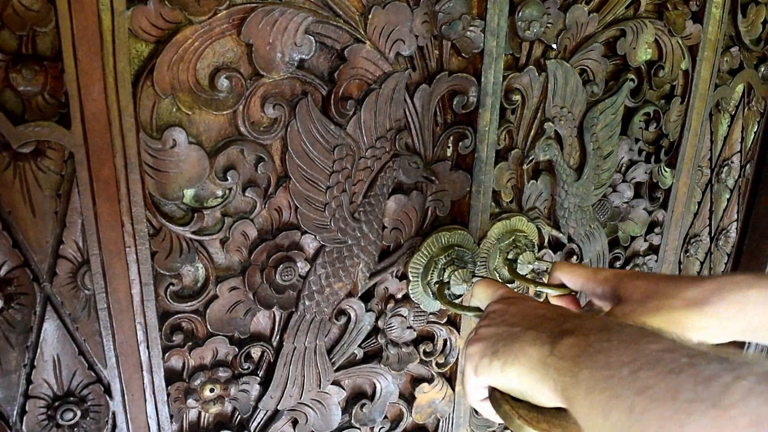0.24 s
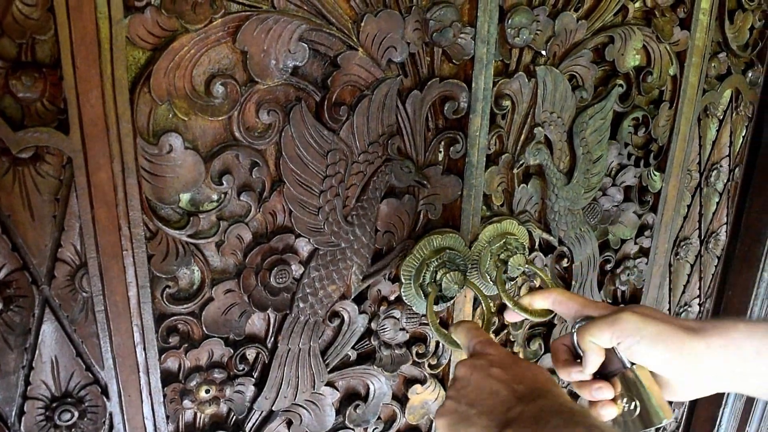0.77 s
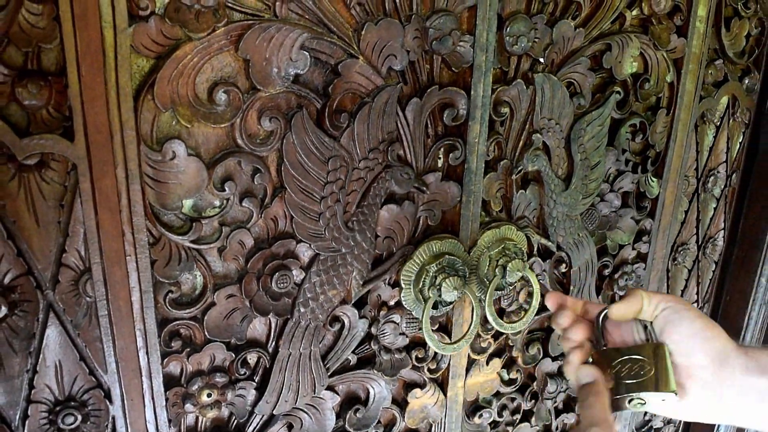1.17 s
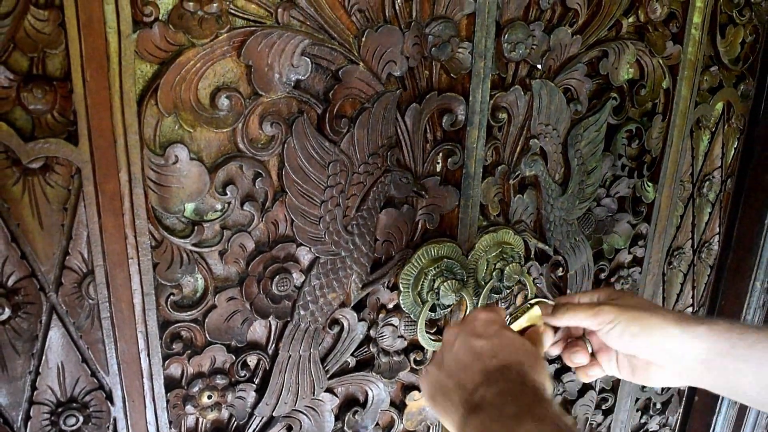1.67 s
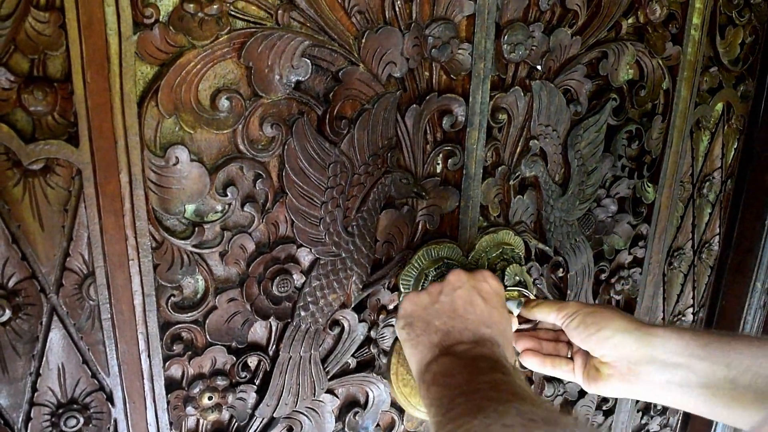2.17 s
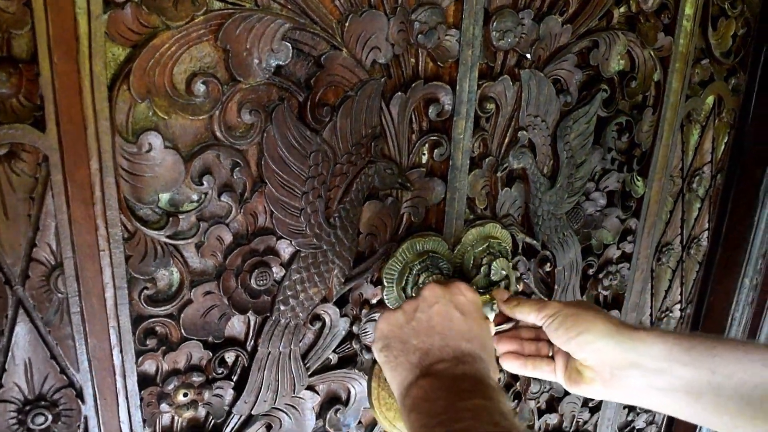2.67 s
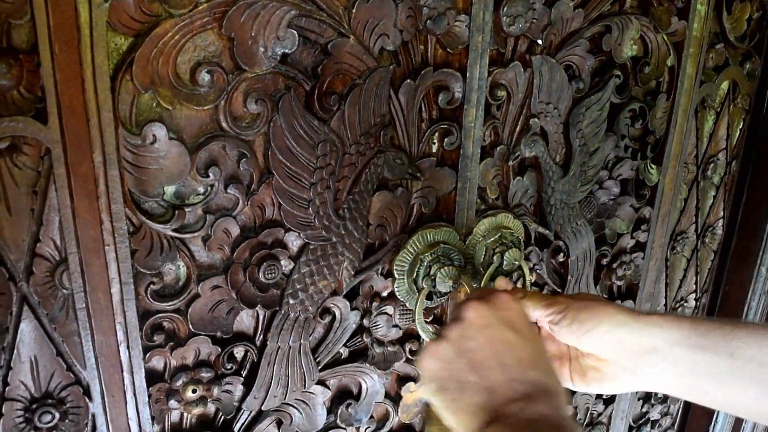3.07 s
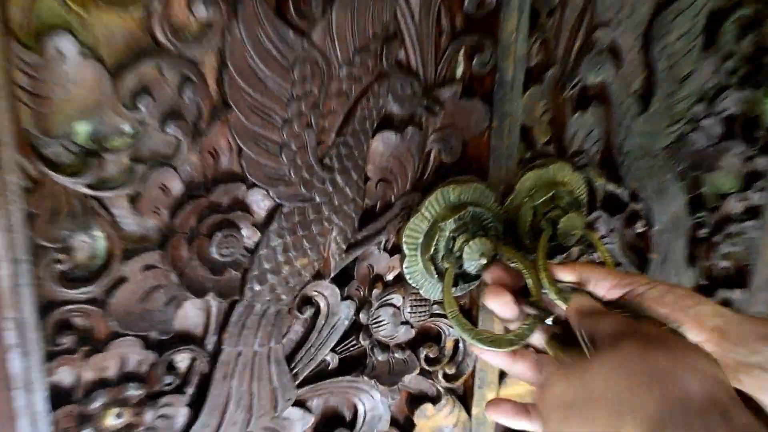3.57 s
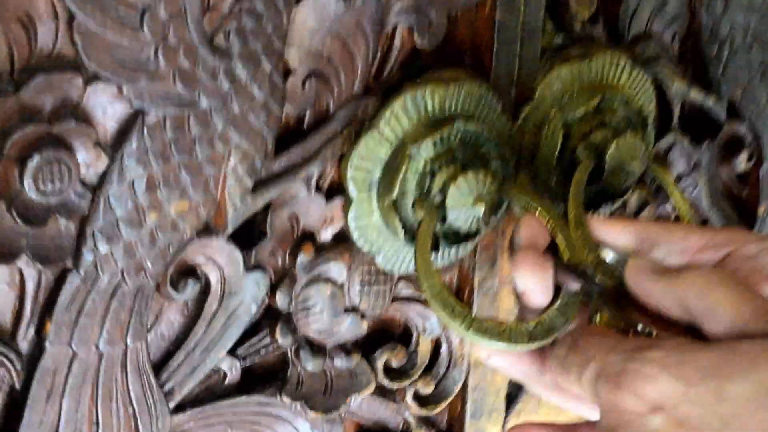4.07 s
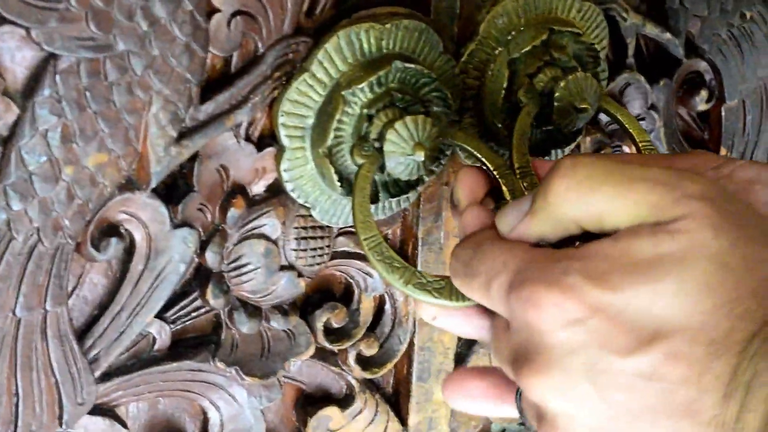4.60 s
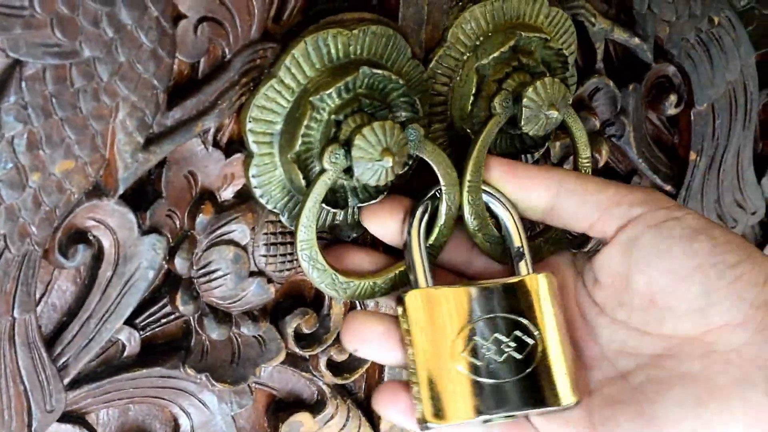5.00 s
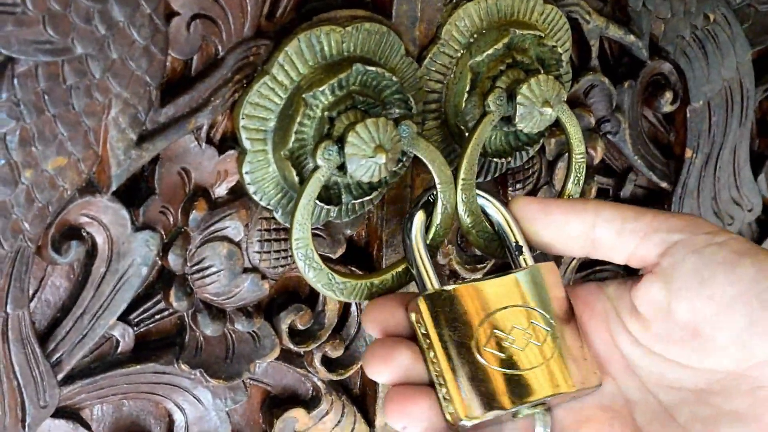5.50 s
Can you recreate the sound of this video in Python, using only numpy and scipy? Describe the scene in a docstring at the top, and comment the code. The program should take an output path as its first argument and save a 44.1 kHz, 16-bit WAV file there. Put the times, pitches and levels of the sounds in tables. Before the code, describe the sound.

In a small porch, heavy door leaves bump shut with a cluster of loud, booming wooden thuds and a faint squeak. Brass rings and a padlock then clink, rattle and scrape irregularly, with a few sharp clanks, until the padlock snaps shut. Fingers bump the hand-held camera's case; a distant bird whistles upward twice over faint air and rumble.

```python
"""In a small porch, close to a heavy carved wooden door, with one microphone in a hand-held camera.
The leaves squeak on a dry hinge and thud shut: noise and panel modes shaped register by register.
Brass ring handles and a padlock clink and scrape: struck modes, and trains of tiny slips.
The padlock snaps shut; fingers bump the camera, whose case ticks, and a bird slurs upward twice.
Behind lie filtered-noise air and rumble, and a faint hum of wavering tones."""
import sys
import numpy as np
from scipy import signal
from scipy.fft import rfft, irfft, next_fast_len
from scipy.io import wavfile
from scipy.ndimage import uniform_filter1d, map_coordinates

SR = 44100
rng = np.random.default_rng(int(sys.argv[2]) if len(sys.argv) > 2 else 0)


def int16_out(signal):
    """Quantize to a 16-bit WAV file."""
    q = np.round(np.clip(np.atleast_2d(signal).T, -1, 1) * 32767)
    wavfile.write(sys.argv[1], SR, q.astype(np.int16))


N = 253442

# Door leaves meet [t/s, clack level/dB before the door trim, wood level/dB before the door trim,
# treble slope/dB per octave, chatter/s]
THUDS = [(0.079, -4.5, -8.5, -8, 0.00071), (.104, -2.5, -1, -7.5, 0.013), (.126, -15.5, -2, -5, .024),
         (.159, -21.5, -2.5, -3.5, 0.011), (.203, -22.5, -9, -5.5, 0.012), (.254, -8, -4, -16.5, 0.044),
         (.281, -17, -7.5, -10.5, 0.052), (.447, -8.5, -19, -14.5, 0.0043), (.455, -18.5, -7.5, 0, 0.0029),
         (.472, -22.5, -11, -6.5, 0.003)]
# Door panel modes [f/Hz, relative level/dB, t60/s]
DOOR_MODES = [(115, -5, .5), (168, 1, .5), (205, -5, .3), (240, -5, .3), (383, -2, .3), (455, 0, .3),
              (520, -5, .2), (618, -1, .25), (732, -4, .2), (883, -4, .18), (997, -3, .18), (1121, -5, .18),
              (1243, -3, .2)]
# Fading of the door's crowd of weaker modes [f/Hz, t60/s]
DOOR_FADE = [(100, 0.1), (500, 0.13), (1200, 0.11), (3000, 0.017), (12000, 0.013)]
# Tone of the door before its registers are set [f/Hz, gain/dB]
DOOR_TONE = [(35, -39.5), (60, -21.5), (90, -4), (160, -4), (250, 0), (400, 0), (600, 7.5), (1200, 6),
             (2500, -5), (4000, -16.5), (6500, -32.5), (15000, -57.5)]
# Edges of body, knock, clack, edge and tick [f/Hz]
REGISTERS = (25, 280, 800, 2500, 6000, 16000)
BOOM_DB = -2  # body register relative to the knock, as the whole leaf booms
LEAD_S = .008  # time allowed for the graze before a blow
GRAZE_S, GRAZE_SHARE = 0.00055, 0.19  # swell time of a blow, and the share of its chatter added to it

# Brass on brass [t/s, clack level/dB, wood level/dB, treble slope/dB per octave, chatter/s]
CLINKS = [(.491, -20, -21, -9, 0.0063), (.523, -16, -24.5, -15.5, 0.0049),
          (.568, -22.5, -29.5, -16, 0.0074), (.598, -27.5, -27, -13, 0.0057), (.673, -38.5, -32, -2, .002),
          (.724, -38, -40, -2.5, 0.0027), (.745, -24.5, -35, -11.5, 0.0027),
          (.789, -31, -29.5, -31.5, 0.0058), (.82, -35, -23, -27, 0.0077), (.870, -17, -28.5, -16, 0.0018),
          (.91, -21.5, -25.5, -11.5, .006), (.957, -20, -26.5, -7.5, 0.0093),
          (.991, -29.5, -32.5, -7, 0.0063), (1.057, -27.5, -43, -9, .02), (1.099, -25, -41, -8.5, 0.0065),
          (1.127, -24, -38, -13, .013), (1.151, -21, -29.5, -4, 0.0026), (1.176, -22.5, -33, -8, 0.018),
          (1.212, -19, -27, -0.5, 0.013), (1.232, -17, -23.5, -7.5, 0.019),
          (1.339, -29, -46, -15.5, 0.0071), (1.399, -40, -46, -13, 0.0033),
          (1.442, -34.5, -40, -22, 0.0082), (1.521, -28.5, -55, -8.5, 0.0079),
          (1.568, -32.5, -34.5, -3, 0.01), (1.997, -56.5, -57, 7.5, .01), (2.121, -24, -28, 0.5, 0.013),
          (2.177, -10, -18.5, -2, 0.0044), (2.26, -21, -26.5, -7, 0.013), (2.401, -42, -30.5, -14, 0.0078),
          (2.558, -29, -30, -13, .0035), (2.652, -20.5, -29, -5, 0.01), (2.683, -21.5, -28.5, -16, 0.012),
          (2.701, -16, -36, -8.5, .009), (2.731, -19.5, -15, -4, .006), (2.816, -27, -39, -9.5, 0.0039),
          (2.922, -34.5, -48, -14, 0.0027), (2.952, -29, -20, -0.5, 0.003), (3.01, -21, -27, -5.5, 0.0081),
          (3.069, -23.5, -32.5, -6.5, .015), (3.089, -8, -17, -4.5, .004), (3.126, -33.5, -16.5, -1, 0.009),
          (3.156, -26, -25.5, -8.5, 0.0023), (3.239, -27, -47.5, -4, .0012), (3.324, -37, -41.5, -12, .018),
          (3.397, -28, -35.5, -4.5, .005), (3.462, -29.5, -33, -4.5, 0.0078),
          (3.561, -26.5, -29, -1, 0.0036), (3.641, -30, -33.5, -5.5, .008), (3.802, -31, -36.5, -7, 0.028),
          (3.835, -24.5, -33.5, -5, 0.0028), (4.122, -39.5, -24.5, -13, 0.0071),
          (4.275, -35, -41, -4.5, 0.0015), (4.314, -30.5, -31.5, -4, .0025),
          (4.403, -38.5, -34.5, -2, .0026), (4.568, -10, -16.5, -0.5, 0.0013),
          (4.656, -25.5, -20.5, -5.5, 0.0028), (4.675, -12.5, -16, 1.5, .002), (4.797, -48, -32, -9, .007),
          (4.855, -30.5, -30.5, -17, 0.0046), (4.914, -26, -24.5, -0.5, 0.0028),
          (4.94, -22, -25, -8.5, 0.0063), (5.062, -24, -31.5, -6.5, 0.017), (5.101, -23, -19, -7, 0.013)]
# Modes of rings and rosettes on the wood [f/Hz, relative level/dB, t60/s]
BRASS_MODES = [(329, -1.5, 0.29), (591.7, 7.5, 0.15), (746.3, 3.5, 0.12), (871.3, 9, 0.058),
               (965.6, 4.5, 0.13), (1281, -4.5, 0.2), (1400, -44, 0.073), (1550, -8.5, 0.092),
               (1847, 5, 0.088), (2136, 12.5, 0.038), (2585, 0, 0.062), (2800, -8.5, 0.037),
               (3320, -22.5, 0.033), (3920, -7, 0.047), (5110, -8, 0.065), (8230, 10.5, 0.052)]
# Fading of the brass's crowd of weaker modes [f/Hz, t60/s]
BRASS_FADE = [(200, 0.16), (900, 0.11), (2000, 0.077), (5000, 0.036), (14000, 0.004)]
# Tone of the brass before its registers are set [f/Hz, gain/dB]
BRASS_TONE = [(60, -29), (150, -0.5), (400, -2.5), (900, 8), (1800, 4), (3000, -2), (4500, -6),
              (6000, -16.5), (8200, -17), (10500, -26), (15000, -28)]
# Brass lands again: delay, change in clack and in wood level, and in slope (dB per octave)
REBOUND_S, REBOUND_DB, REBOUND_WOOD_DB, REBOUND_SLOPE = .011, -8.5, -3.5, -4

# A ring swings free against its rosette [t/s, peak level/dB]
DROPS = [(1.236, -12), (2.179, 0.5), (3.091, -18.5), (4.942, -15.5)]
# Modes of the free ring [f/Hz, relative level/dB, t60/s]
RING_MODES = [(859, -3, 0.089), (981, -1, 0.064), (1916, -15.5, .1), (3840, -14.5, 0.051)]
# The steel shackle is tapped and free to ring [t/s, peak level/dB]
TINGS = [(1.152, -22), (1.952, -37), (3.239, -29), (3.395, -51)]
# Modes of the shackle [f/Hz, relative level/dB, t60/s]
SHACKLE_MODES = [(7600, -6, 0.039), (10400, -1, 0.057), (13000, -2.5, 0.049), (14400, -6.5, 0.041),
                 (15380, -18, 0.038)]
# The padlock snaps shut [t/s, peak level/dB]
SNAPS = [(4.574, -12), (4.682, -9)]
# Modes of the padlock's body [f/Hz, relative level/dB, t60/s]
PADLOCK_MODES = [(327, -7, 0.21), (1277, -8.5, 0.051), (1780, -6, .05), (1674, -4, .05),
                 (4240, -14.5, 0.049)]

# Metal slides on metal [start t/s, length/s, level/dB before the slide trim]
SLIDES = [(.5, .1, -29), (.78, 0.2, -37), (1.13, 0.17, -33), (1.4, .2, -47), (2.28, 0.026, -34.5),
          (2.44, 0.017, -39), (2.545, 0.016, -41.5), (2.67, 0.083, -32.5), (3.02, .17, -37),
          (3.39, 0.075, -38), (3.58, .37, -43.5), (4.125, 0.034, -44), (4.4, .14, -45), (4.6, 0.085, -32),
          (4.87, 0.055, -37.5), (5.04, 0.089, -33), (5.45, .14, -50)]
SLIDE_ATTACK_S, SLIDE_RELEASE_S = 0.015, 0.018
# A ring binds in its eye [start t/s, level/dB, length/s]
GRIND = [(0.355, -27.5, 0.0092), (0.376, -22.5, 0.035)]
# Tone of the scrape [f/Hz, gain/dB]
SCRAPE_TONE = [(150, -21.0), (400, 0.5), (600, 7), (1000, 0.5), (2000, -1.5), (3000, -10),
               (4500, -16.0), (8000, -25.5), (15000, -41.5)]
# Tone of the binding ring [f/Hz, gain/dB]
GRIND_TONE = [(600, -18.0), (1650, -17.0), (1950, 6.5), (2130, -11), (2330, 2.5), (2700, -25),
              (4700, -26.0), (9000, -46.0)]

# Dry hinge squeaks [start t/s, length/s, starting f/Hz, level/dB before flutter, dB per overtone]
SQUEAKS = [(0, 0.1, 1093, -36, -15), (0.371, 0.012, 1407, -30.5, -6)]
SQUEAK_ATTACK_S, SQUEAK_RELEASE_S = 0.0093, .005
SQUEAK_RISE_HZ_PER_S = 700  # the pitch climbs as the leaf gathers speed

# Fingers bump the camera [t/s, level/dB]
BUMPS = [(3.713, -27), (3.871, -26), (3.924, -27), (3.955, -24.5), (4.02, -21.5), (4.033, -25.5),
         (4.057, -26), (4.077, -24), (4.17, -25.5), (4.207, -32), (4.221, -18.5), (4.386, -24.5)]
BUMP_HZ, BUMP_SPREAD = 108, 0.055  # the camera body's pitch, and its scatter as a share
# The grip tightens [start t/s, length/s, level/dB]
GRIPS = [(3.6, 0.617, -44)]
GRIP_ATTACK_S, GRIP_RELEASE_S = .03, 0.036
# Tone of ticks in the camera's case [f/Hz, gain/dB]
CASE_TONE = [(60, 1), (300, 14.5), (900, 16.5), (3000, -1), (8000, -2.5), (13000, -8.5), (16000, -9.5)]

# Bird whistles [start t/s, length/s, level/dB at the last pitch, before the porch answers]
WHISTLES = [(0.93, .25, -47.5), (4.145, .32, -50)]
# Tune of a whistle [share of its length, f/Hz before the burr]
SLUR = [(0, 3700), (.15, 4000), (.42, 4300), (.55, 4800), (.68, 5550), (.82, 5720), (1, 5700)]
BIRD_SWELL_DB = 8.5  # louder by this much per octave of rise

# Fading of the porch's answer [f/Hz, t60/s]
PORCH_FADE = [(100, 0.48), (500, 0.3), (2000, 0.24), (6000, 0.17), (14000, 0.16)]
# Tone of the steady air [f/Hz, relative level/dB per Hz]
AIR_TONE = [(25, -11), (60, -12.5), (110, -20), (230, -8.5), (330, -6.5), (600, -10), (1500, -15.5),
            (2500, -20.5), (5000, -22), (8000, -27.5), (15000, -36.5)]
# Distant motor [f/Hz, mean level/dB]
HUM = [(116, -63.5), (167, -63), (238, -54), (622, -61)]
# Tone of the low rumble [f/Hz, gain/dB]
RUMBLE_TONE = [(15, -11.5), (32, -1.5), (55, -5), (115, 3), (190, 0), (320, -12.5), (700, -17.5),
               (2000, -48.5)]
# Hands lean on the door and it rumbles [start t/s, length/s, level/dB before the rumble trim]
LEANS = [(0, .75, -33), (1.05, 0.11, -47), (2.27, .08, -34.5), (2.82, 2.45, -42.5), (5.05, 0.063, -40.5)]
LEAN_ATTACK_S, LEAN_RELEASE_S = .025, 0.088
REST_DB = -57.5  # rumble between the leans, before the rumble trim
TOP_HZ = 15900  # the camera's band limit


def door(modes_db=-9, wet_db=-7, trim_db=-1):
    """The heavy leaves bump together: panel modes and a chattering crowd of weaker ones boom."""
    out = np.zeros(N)
    for s, db, wood_db, slope, chatter in THUDS:
        blow = contact(DOOR_FADE, DOOR_MODES, chatter, modes_db, wet_db, grain_db=6.5)
        levels = [wood_db + BOOM_DB, wood_db, *treble(db, slope)]
        add(out, s - LEAD_S, voiced(colour(blow, DOOR_TONE), REGISTERS, levels))
    return amp(trim_db) * out


def rings(modes_db=-6, wet_db=-9):
    """Rings, padlock and rosettes strike, then land again softer and duller; the door sounds along."""
    out = np.zeros(N)
    for s, db, wood_db, slope, chatter in CLINKS:
        for k in (0, 1):  # the strike, then its rebound
            blow = contact(BRASS_FADE, BRASS_MODES, chatter, modes_db, wet_db, grain_db=4.0)
            upper = treble(db + k * REBOUND_DB, slope + k * REBOUND_SLOPE)
            levels = [wood_db + k * REBOUND_WOOD_DB, *upper]
            shaped = voiced(colour(blow, BRASS_TONE), REGISTERS[1:], levels)
            add(out, s + k * REBOUND_S - LEAD_S, shaped)
    return out


def free_metal(blows, modes):
    """Metal that no hand damps rings in clear decaying modes after a tap."""
    out = np.zeros(N)
    for s, db in blows:
        note = ringing(modes, scatter_db=1)
        add(out, s, amp(db) * note / np.abs(note).max())
    return out


def sliding(trim_db=-2):
    """The shackle scrapes along the rings in many tiny slips, and a ring binds briefly in its eye."""
    t = np.arange(N) / SR
    scrape = rubbed(280, SCRAPE_TONE)
    bind = sum(amp(db) * np.exp(-2 * ((t - s - length / 2) / length) ** 2) for s, db, length in GRIND)
    grind = rubbed(1100, GRIND_TONE)
    strokes = amp(trim_db) * swells(SLIDES, SLIDE_ATTACK_S, SLIDE_RELEASE_S)
    return in_porch(strokes * scrape, wet_db=-11) + bind * grind


def hinge(waver=0.022, flutter_db=4.5, wet_db=-7):
    """Stick and slip in the hinge makes a thin, wavering squeak of three harmonics."""
    out, t = np.zeros(N), np.arange(N) / SR
    for s, length, hz, db, overtone_db in SQUEAKS:
        pitch = hz + SQUEAK_RISE_HZ_PER_S * np.clip(t - s, 0, length)
        phase = 2 * np.pi * np.cumsum(pitch * (1 + waver * wobble(400))) / SR
        # the third harmonic is halved again
        harmonics = [amp(overtone_db * k) * np.sin((k + 1) * phase) / (1 + (k > 1)) for k in range(3)]
        out += swells([(s, length, db)], SQUEAK_ATTACK_S, SQUEAK_RELEASE_S) * unit(sum(harmonics))
    return in_porch(amp(flutter_db * wobble(160)) * out, wet_db)


def handling(life_s=0.0046, ticks_per_s=230, click_db=-14):
    """Fingers bump the camera body with a thump and a click, and its grip ticks, close and dry."""
    out, t = np.zeros(N), np.arange(SR // 8) / SR
    tick = np.exp(-t / 0.00079)
    for s, db in BUMPS:
        hz = BUMP_HZ * (1 + BUMP_SPREAD * rng.standard_normal())
        thump = t / life_s * np.exp(1 - t / life_s) * np.sin(2 * np.pi * hz * t)
        click = colour(tick * rng.standard_normal(len(t)), CASE_TONE)
        add(out, s, amp(db) * (thump + amp(click_db) * click))
    slips = (rng.random(N) < ticks_per_s / SR) * rng.uniform(0.38, 1, N)
    ticks = signal.fftconvolve(slips, tick)[:N] * rng.standard_normal(N)
    return out + swells(GRIPS, GRIP_ATTACK_S, GRIP_RELEASE_S) * unit(colour(ticks, CASE_TONE))


def bird(wet_db=2):
    """A bird some way off slurs upward; fast random pitch changes put a burr in its note."""
    out = np.zeros(N)
    for s, length, db in WHISTLES:
        u = np.linspace(0, 1, int(length * SR))
        hz = np.interp(u, *np.transpose(SLUR))
        phase = 2 * np.pi * np.cumsum(hz * (1 + .032 * wobble(600)[:len(u)])) / SR
        gain = amp(db + BIRD_SWELL_DB * np.log2(hz / hz[-1])) * signal.windows.tukey(len(u), .25)
        add(out, s, gain * np.sin(phase))
    return in_porch(out, wet_db)


def outdoors(air_db=-54, rumble_trim_db=-3):
    """Steady air, a faint motor hum and a low rumble that swells as hands lean on the door."""
    t = np.arange(N) / SR
    air = amp(air_db + 0.39 * wobble(0.82)) * unit(colour(rng.standard_normal(N), AIR_TONE))
    low = unit(colour(rng.standard_normal(N), RUMBLE_TONE))
    hum = sum(amp(db + 1.2 * wobble(1.5)) * np.sin(2 * np.pi * hz * t + 1.3 * wobble(6))
              for hz, db in HUM)
    leaning = amp(REST_DB) + swells(LEANS, LEAN_ATTACK_S, LEAN_RELEASE_S)
    return air + hum + amp(rumble_trim_db) * leaning * low


def contact(fade, modes, chatter, modes_db, wet_db, grain_db):
    """A graze, then rebounds feed the weak modes for chatter seconds; strong modes and porch ring on."""
    t = np.arange(SR // 2) / SR - LEAD_S
    rebounds = unit(uniform_filter1d(rng.standard_normal(len(t)), size=48))
    grain = amp(grain_db * rebounds * np.exp(-np.abs(t) / 0.15))
    attack = .5 + .5 * np.tanh(t / (GRAZE_S + GRAZE_SHARE * min(chatter, .02)))
    crowd = unit(fading(fade, LEAD_S + chatter) * attack * grain)
    strong = np.pad(ringing(modes, scatter_db=4.5), (round(LEAD_S * SR), 0))[:len(t)]
    walls = unit(fading(PORCH_FADE) * (1 - np.exp(-np.maximum(t, 0) / 0.0049)))
    return crowd + amp(modes_db) * attack * strong + amp(wet_db) * walls


def voiced(blow, edges, levels):
    """Random ripple picks which modes a blow favours; then each register is steered to its peak level."""
    hz = np.arange(20, 16000, 90)
    ripple_db = 3.3 * rng.standard_normal(len(hz)) * np.minimum(hz / 1000, 1)
    blow = colour(blow, np.column_stack([hz, ripple_db]))
    parts = [band(blow, lo, hi) for lo, hi in zip(edges, edges[1:])]
    peaks = [np.sqrt(uniform_filter1d(p ** 2, size=220).max()) for p in parts]  # 5 ms rms
    centres = np.sqrt(np.multiply(edges[:-1], edges[1:]))
    return colour(blow, np.column_stack([centres, np.array(levels) - 20 * np.log10(peaks)]))


def treble(db, slope):
    """Levels of clack, edge and tick: from the clack up they follow slope in dB per octave."""
    centres = np.sqrt(np.multiply(REGISTERS[2:-1], REGISTERS[3:]))
    return db + slope * np.log2(centres / centres[0])


def ringing(modes, scatter_db):
    """Damped modes, struck at new strengths and signs each time."""
    t = np.arange(SR // 2) / SR
    hz, db, t60 = np.transpose(modes)[:, :, None]
    size = amp(db + scatter_db * rng.standard_normal(hz.shape)) * rng.choice([-1, 1], hz.shape)
    decay = np.exp(-np.log(1000) * t / t60)
    return unit(np.sum(size * decay * np.sin(2 * np.pi * hz * t), axis=0))


def rubbed(slips_per_s, tone):
    """Tiny random slips, each a short rasp of the metal."""
    slips = (rng.random(N) < slips_per_s / SR) * rng.exponential(size=N) ** 2
    energy = signal.fftconvolve(slips, np.exp(-np.arange(SR // 20) / SR / 0.0026))[:N]
    return unit(colour(np.sqrt(np.abs(energy)) * rng.standard_normal(N), tone))


def in_porch(x, wet_db):
    """The sound with the diffuse answer of the nearby walls, which builds up and dies away."""
    tail = fading(PORCH_FADE) * (1 - np.exp(-np.arange(SR // 2) / SR / 0.0044))
    return x + amp(wet_db) * signal.fftconvolve(x, tail / np.linalg.norm(tail))[:len(x)]


def fading(fade, hold=0):
    """Half a second of noise, held for hold seconds; then each frequency dies at its own speed."""
    hz, t, z = signal.stft(rng.standard_normal(SR // 2), SR, nperseg=128)
    decay = amp(-60 * np.maximum(t - hold, 0) / along(fade, hz)[:, None])
    return unit(signal.istft(z * decay, SR, nperseg=128)[1][:SR // 2])


def swells(rows, attack, release):
    """Gain of (start s, length s, dB) gestures: each rises up to its start, holds and dies away."""
    t = np.arange(N) / SR
    gain = 0
    for s, length, db in rows:
        before, after = np.maximum(s - t, 0), np.maximum(t - s - length, 0)
        gain = gain + amp(db) * np.exp(-before / attack - after / release)
    return gain


def colour(x, points):
    """Causal minimum-phase filter with the given (Hz, dB) gain, made by folding the cepstrum."""
    m = 2 * next_fast_len(len(x) // 2 + 4096)
    cep = irfft(np.log(amp(along(points, np.fft.rfftfreq(m, 1 / SR)))))
    cep[1:m // 2] *= 2
    cep[m // 2 + 1:] = 0
    return irfft(rfft(x, m) * np.exp(rfft(cep)))[:len(x)]


def band(x, lo, hi):
    """Causal band-pass between lo and hi Hz."""
    return signal.sosfilt(signal.butter(3, [lo, hi], 'band', fs=SR, output='sos'), x)


def wobble(rate):
    """A smooth random curve, rate knots a second."""
    knots = rng.standard_normal(int(N * rate / SR) + 4)
    return map_coordinates(knots, [np.arange(N) * rate / SR])


def along(points, hz):
    """(Hz, value) points read on a log frequency axis."""
    f, v = np.transpose(points)
    return np.interp(np.log(hz + 1), np.log(f + 1), v)


def amp(db):
    """Decibels to gain."""
    return 10 ** (np.asarray(db) / 20)


def unit(x):
    """Scale to rms 1."""
    return x / np.sqrt(np.mean(x ** 2) + 1e-20)


def add(track, s, sound):
    """Mix a sound into the track at s seconds."""
    i = max(round(s * SR), 0)
    track[i:i + len(sound)] += sound[:N - i]


def scene():
    """Everything at one microphone."""
    strikes = door() + hinge() + rings()
    clear_notes = free_metal(DROPS, RING_MODES) + free_metal(TINGS, SHACKLE_MODES)
    clear_notes += free_metal(SNAPS, PADLOCK_MODES)
    return (strikes + clear_notes + sliding() + handling() + bird() + outdoors())[None]


def record(dry):
    """The camera clips peaks beyond full scale and keeps nothing above its band limit."""
    m = next_fast_len(N + SR // 2)
    clipped = np.clip(dry, -1, 1)
    return irfft(rfft(clipped, m) * (np.fft.rfftfreq(m, 1 / SR) < TOP_HZ), m)[..., :N]


dry = scene()
out = record(dry)
int16_out(out)
```